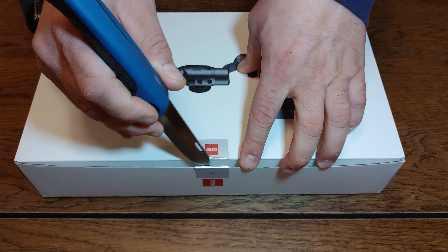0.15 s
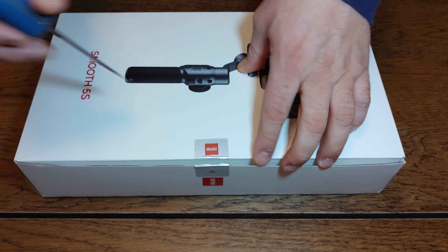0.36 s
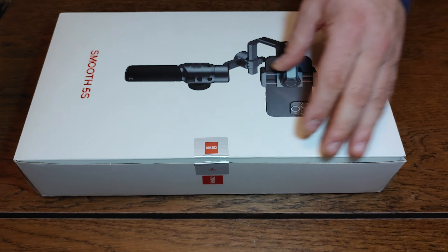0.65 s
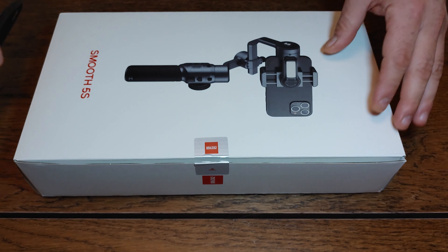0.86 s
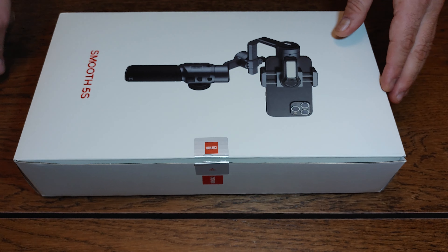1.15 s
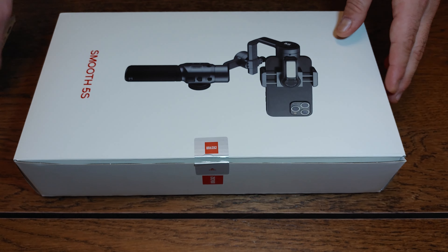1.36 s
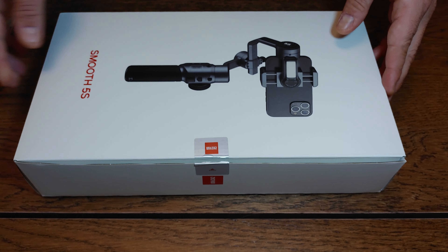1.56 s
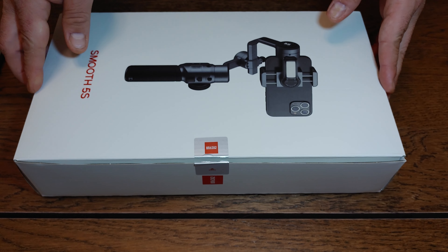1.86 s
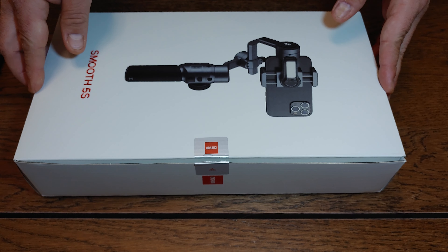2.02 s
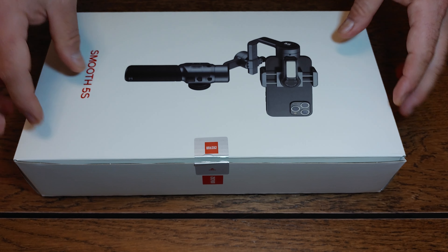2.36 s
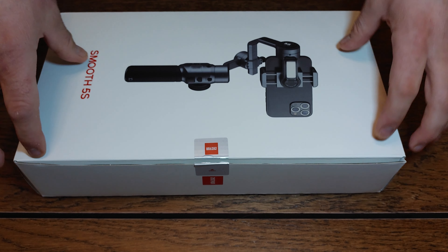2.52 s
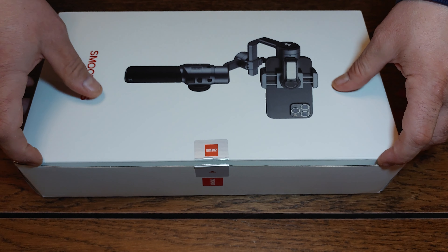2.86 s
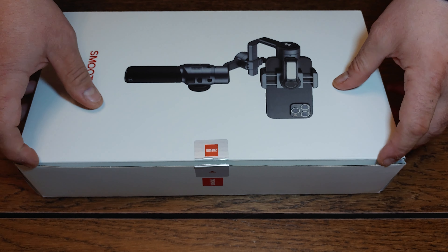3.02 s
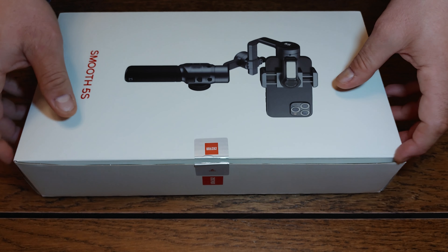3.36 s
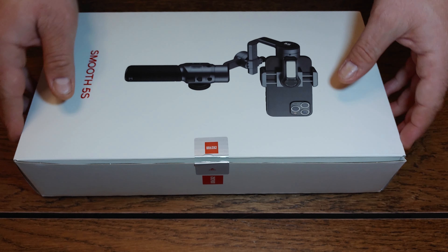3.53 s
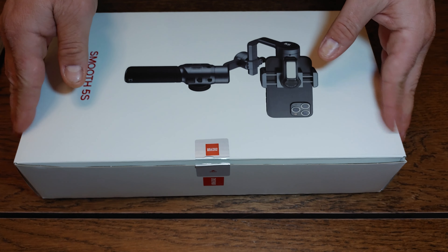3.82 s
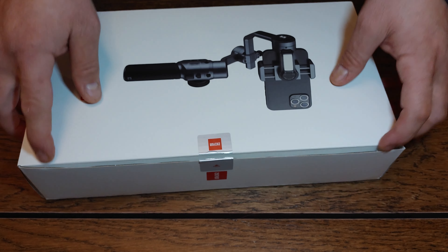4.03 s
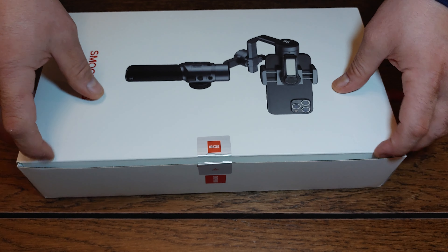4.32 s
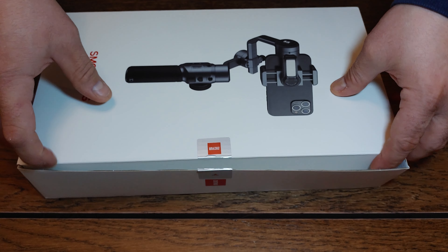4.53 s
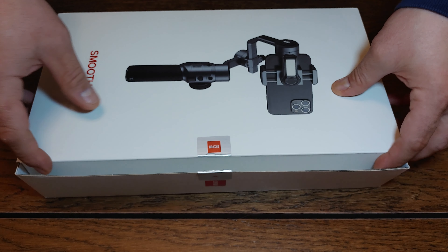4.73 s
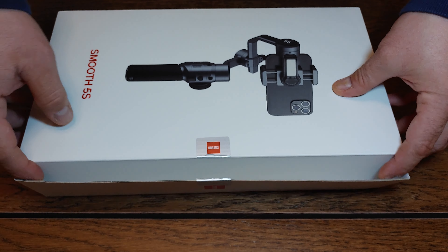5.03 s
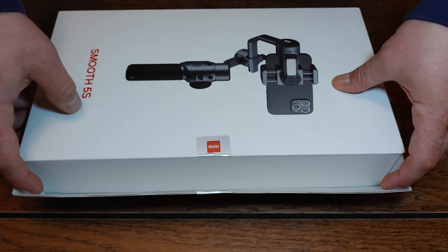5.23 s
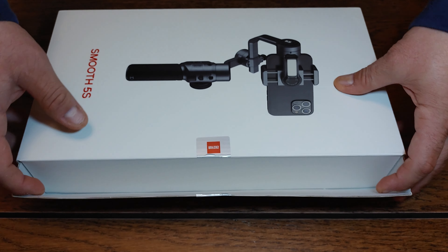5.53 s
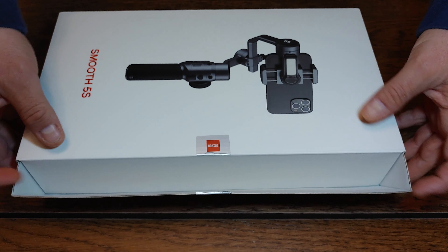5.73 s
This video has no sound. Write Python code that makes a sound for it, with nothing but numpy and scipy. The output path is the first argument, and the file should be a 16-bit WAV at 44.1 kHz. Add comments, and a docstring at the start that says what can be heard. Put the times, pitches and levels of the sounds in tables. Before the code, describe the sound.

A close, dry indoor sound of hands on a sturdy cardboard box on a wooden table, over a very faint room hush. From 0 to 0.7 s fingers brush the coated card, with low rubbing, small snaps and dull taps around 0.2 and 0.55 s. Near 1.2 s the box knocks hollowly and its contents rattle; softer knocks and a rub follow to 1.5 s, then a tiny hollow tick at 1.7 s. It is nearly quiet until 2.2 s. Light taps and short grainy swishes run from 2.5 to 3.9 s. From 4 s the tight lid drags in louder, overlapping rasps, with sinking boxy pops and a very sharp crack at about 4.37 s; strong thumps and clacks follow at 4.65 and 4.75 s. Looser scraping continues past 5 s, easing around 5.4 s, more pops near 5.6 s, then a bright scrape and rapid three-catch chatter at 5.8 s.

```python
"""Tight lid on a cardboard box

Two hands work the tight lid off a cardboard box on a wooden table, close by in a small room.
The box knocks on the table and rings in decaying modes; fingers rub its coated sides as grainy friction.
Then the lid drags upward in a denser rasp, its walls popping as sinking swings and its edges snapping
as noise bursts; it lets go with a short stick-slip chatter. The table sways below, over a quiet floor.
"""
import sys
import numpy as np
from scipy import signal
from scipy.fft import rfft, irfft
from scipy.io import wavfile

SR = 44100
rng = np.random.default_rng(int(sys.argv[2]) if len(sys.argv) > 2 else 0)


def master(y):
    """Save y as 16-bit WAV."""
    cut = np.clip(np.atleast_2d(y).T, -1, 1)
    pcm = np.round(cut * 32767)  # scale
    wavfile.write(sys.argv[1], SR, pcm.astype(np.int16))


N = 259308
TIME = np.arange(N) / SR


def amp(db):
    """Level to amplitude: 20 dB is a factor of ten."""
    return 10 ** (np.asarray(db) / 20)


def evened(x):
    """Power normalization: scales to rms 1."""
    return x / np.sqrt(np.mean(x ** 2) + 1e-20)


def peaked(x):
    """Peak normalization: scales to peak 1."""
    return x / (abs(x).max() + 1e-20)


def read(points, hz):
    """Interpolation on a log-frequency axis."""
    f, value = np.transpose(points)
    return np.interp(np.log(hz + 1), np.log(f + 1), value)


def add(mix, s, sound):
    """Superposition: mixes a sound in from time s, in place."""
    part = mix[max(round(s * SR), 0):][:len(sound)]
    part += sound[:len(part)]


def colour(x, points, size=4096):
    """Minimum-phase filtering: a causal response with the given spectrum."""
    log_gain = np.log(amp(read(points, abs(np.fft.fftfreq(size, 1 / SR)))))
    # the Hilbert transform of the log gain supplies the phase
    response = np.fft.ifft(np.exp(np.conj(signal.hilbert(log_gain)))).real
    return signal.fftconvolve(x, response[:size // 2])[:len(x)]


def wander(hz, size=N):
    """Band-limited chance: smooth noise of rms 1 with a Gaussian roll-off at the given rate."""
    roll_off = np.exp(-(np.fft.rfftfreq(size, 1 / SR) / hz) ** 2)
    return evened(irfft(rfft(rng.standard_normal(size)) * roll_off, size))


def tail(t60s, size=24000):
    """Diffuse decay: dense ringing of energy 1, each band dying at its own speed."""
    hz, t, z = signal.stft(rng.standard_normal(size), SR, nperseg=256)
    decay = amp(-60 * t / read(t60s, hz)[:, None])
    ring = signal.istft(z * decay, SR, nperseg=256)[1][:size]
    return ring / np.linalg.norm(ring)


def roam(x, depth_db, patch_hz, patch_s, size=1024):
    """Moving excitation: a contact travelling over the panel wakes one resonance group after another."""
    overlap = size * 3 // 4
    hz, t, z = signal.stft(x, SR, nperseg=size, noverlap=overlap)
    across, along = np.fft.fftfreq(len(hz), hz[1])[:, None], np.fft.fftfreq(len(t), t[1])
    blur = np.exp(-(across * patch_hz) ** 2 - (along * patch_s) ** 2)
    patches = evened(np.fft.ifft2(np.fft.fft2(rng.standard_normal(z.shape)) * blur).real)
    return signal.istft(z * amp(depth_db * patches), SR, nperseg=size, noverlap=overlap)[1][:N]


def friction(spectra, grains_per_s, grain_db, smooth, judder_db, judder_hz, roam_db, patch_hz, patch_s):
    """Granular friction: uneven tiny slips, bunched by the hand's judder; one sound per card spectrum."""
    sizes = amp(grain_db * np.minimum(rng.exponential(1, N), 4))
    grains = (rng.random(N) < grains_per_s / SR) * rng.choice([-1, 1], N) * sizes
    drive = evened(grains) + smooth * rng.standard_normal(N)
    drive = drive * amp(judder_db * wander(judder_hz))
    drive = roam(drive, roam_db, patch_hz, patch_s)
    return [evened(colour(drive, spectrum)) for spectrum in spectra]


# ringing of the card's dense upper modes: (frequency [Hz], t60 [s])
PANEL_T60 = [(1500, 0.036), (10000, 0.062)]


def panel(x, ring_db=-2, size=6000):
    """Modal overlap: many narrow upper modes ring on after every slip and fuse the grains into a rush."""
    ringing = signal.fftconvolve(x, tail(PANEL_T60, size=size))[:N]
    return evened(x + amp(ring_db) * ringing)


# a stroke is this far down one rise before and one fall after its crest; 1 = pointed crest, 2 = round
STROKE_EDGE_DB, STROKE_ROUNDNESS = -27.5, 1.714
SHEEN_STEEPNESS = 2.4  # the sheen comes only near full speed: its fade in dB is this many times larger


def stroke_gain(rows):
    """Speed law of friction: drone, rasp, hiss and sheen swell to each stroke's crest and sink again."""
    power = np.zeros((4, N))
    edge_db = STROKE_EDGE_DB * np.array([[1], [1], [1], [SHEEN_STEEPNESS]])
    for s, rise, fall, *levels_db in rows:
        away = np.maximum((s - TIME) / rise, (TIME - s) / fall)
        near = away < 2
        shape = amp(edge_db * away[near] ** STROKE_ROUNDNESS)
        power[:, near] += (amp(levels_db)[:, None] * shape) ** 2
    return np.sqrt(power)


# colours of drone, rasp and hiss under the fingers: three lists of (frequency [Hz], density [dB per Hz])
FINGER_COLOURS = [
    [(110, -58), (185, -3), (259, -1), (323, 2), (369, -3.5), (470, -20), (600, -8), (708, -7),
     (813, -13.5), (950, -9.5), (1110, -8.5), (1190, -17.5), (1500, -23), (1950, -27), (3300, -120)],
    [(760, -29), (1300, 6.5), (1490, 1), (1660, -11), (1850, -5), (2160, -1), (2600, 2), (3190, 8),
     (3800, -6), (4940, -47.5), (8360, -120)],
    [(2290, -66.5), (3900, -3), (4400, 7), (5200, 3.5), (5700, 5.5), (6100, 4.5), (6650, 4.5), (7200, 2.5),
     (7970, -0.5), (9060, -11.5), (10400, -19.5), (11800, -21), (12900, -36.5), (15800, -45)],
]
# the same three under the loose lid: (frequency [Hz], density [dB per Hz])
LOOSE_COLOURS = [
    [(65, -18), (110, -63), (135, -34), (172, -8), (199, -0.5), (252, 1.5), (378, -0.5), (461, -10.5),
     (537, -9.5), (626, -1.5), (706, -1.5), (813, -1), (937, 5), (1000, -3.5), (1150, -18.5), (1360, -13),
     (1500, -16.5), (1950, -9), (3300, -120)],
    [(760, -26), (1300, -9), (1610, -1), (1800, 5.5), (1950, -2), (2130, 12), (2390, -6), (2980, -7),
     (3800, -13.5), (4940, -23), (8360, -120)],
    [(2290, -0.5), (3900, -0.5), (4900, 2), (5380, -0.5), (6680, 1), (7560, 3), (8200, -8), (8900, -7),
     (10100, -22), (11900, -22), (12500, -31), (15800, -26)],
]
# the same three while the lid sits tight: (frequency [Hz], density [dB per Hz])
TIGHT_COLOURS = [
    [(65, -49), (110, -35), (150, -14), (205, 7), (258, 3.5), (280, 13.5), (300, -10), (345, 4), (385, 0.5),
     (460, -5.5), (538, -2), (640, -2), (706, -3.5), (770, -0.5), (946, -6), (1030, -10.5), (1090, -3.5),
     (1250, -14), (1500, -21), (1950, -24), (3300, -120)],
    [(760, -37), (1250, 4), (1700, -2), (2050, -13.5), (2400, 4.5), (2850, 3), (3400, 1.5), (3700, -2.5),
     (4100, -5), (5000, -41), (8400, -120)],
    [(1800, -22), (3000, -0.5), (3700, -10), (4300, -3), (4750, 1), (5250, 1), (5750, 1), (6300, 1),
     (7900, 1), (8600, -8.5), (9800, -29), (11700, -18), (12400, -32), (15800, -69)],
]
# colour of the sheen, the brightest part of the hiss: (frequency [Hz], density [dB per Hz])
SHEEN_COLOUR = [(6500, -47), (8800, 3), (9600, -2.5), (11000, -5), (12100, -12.5), (12500, -20),
                (15800, -41)]
# how far the lid has come loose: (time [s], looseness [0-1])
LOOSENESS = [(4.65, 0.25), (4.98, 0.78)]
# fingers brush the box: (time of greatest speed [s], rise [s], fall [s], drone of the board [dB],
# rasp of the fibres [dB], hiss of the coating [dB], sheen [dB])
BRUSHES = [(.012, 0.21, 0.18, -30, -56, -54, -73), (.05, 0.25, 0.04, -54, -42.5, -48.5, -80),
           (.225, 0.095, 0.045, -36.5, -48, -55.5, -63), (.33, 0.18, .1, -69, -63, -69, -72),
           (.408, 0.049, 0.013, -48, -53, -53, -61), (.595, 0.075, 0.1, -41.5, -53, -56, -63),
           (.69, 0.033, 0.018, -69, -69, -61.5, -57), (.83, 0.032, 0.027, -71, -71, -66.5, -87),
           (.97, 0.26, 0.29, -65, -70.5, -79, -86), (1.225, 0.093, 0.061, -49, -55, -66, -85),
           (1.335, 0.19, 0.044, -30, -59, -63.5, -75), (1.368, 0.025, 0.026, -36, -59, -63, -76),
           (1.58, 0.28, 0.095, -61.5, -75, -74.5, -76), (2.245, .03, 0.043, -54, -68.5, -61, -66.5),
           (2.566, 0.032, 0.039, -41.5, -50, -43.5, -62.5), (2.68, 0.2, 0.16, -58.5, -61, -58.5, -77),
           (2.662, 0.041, 0.019, -43.5, -50.5, -42.5, -73), (2.762, 0.048, 0.067, -52, -57, -46, -76),
           (2.852, 0.041, 0.11, -46.5, -70, -61, -63), (3.11, 0.093, 0.055, -43, -65, -57.5, -68),
           (3.23, 0.17, 0.1, -36, -47, -47.5, -66), (3.386, 0.041, 0.055, -39, -48.5, -44.5, -54),
           (3.499, 0.037, 0.038, -39, -51.5, -43.5, -50), (3.58, 0.058, 0.15, -60, -67.5, -65, -78),
           (3.7, 0.11, 0.14, -63, -71, -64.5, -73), (3.8, 0.081, 0.063, -56.5, -71, -67.5, -71),
           (3.9, 0.043, 0.067, -42.5, -59.5, -54, -51.5)]
# the lid slides a little with each pull: (time of greatest speed [s], rise [s], fall [s], drone [dB],
# rasp [dB], hiss [dB], sheen [dB])
PULLS = [(4.023, 0.092, 0.18, -40.5, -45, -38.5, -45.5), (4.147, 0.11, 0.051, -42, -61, -40.5, -55),
         (4.225, 0.17, 0.047, -33.5, -46.5, -62, -80), (4.275, 0.12, 0.064, -31.5, -42.5, -43.5, -59),
         (4.405, 0.12, 0.2, -30.5, -39.5, -42, -56), (4.475, 0.037, 0.088, -28, -39, -51, -70),
         (4.547, 0.091, 0.23, -28, -37, -38, -43.5), (4.658, 0.067, 0.069, -30, -33.5, -34.5, -46),
         (4.785, 0.1, 0.11, -37.5, -43, -50, -62), (4.863, 0.031, 0.15, -36, -38, -39, -54),
         (5.03, 0.22, 0.37, -32, -35, -47.5, -78), (5.216, 0.17, 0.086, -35, -32, -34.5, -51),
         (5.311, 0.31, 0.1, -36, -65, -55.5, -73), (5.46, 0.23, 0.3, -45.5, -68, -62, -75),
         (5.557, 0.084, 0.18, -32, -46.5, -44.5, -54), (5.635, 0.031, 0.12, -33.5, -42, -42, -56),
         (5.725, 0.078, .1, -37, -54, -44.5, -45.5), (5.814, 0.098, 0.067, -35, -33.5, -30, -36),
         (5.878, 0.038, 0.046, -29.5, -34, -42, -52)]


def rubbing(finger_boom_db=-5.5, lid_boom_db=0.5):
    """Sliding friction: fingers brush the coating, the lid drags on the walls; both gain sheen at speed."""
    # each group holds finger, loose lid and tight lid, in that order
    low, mid, high = zip(FINGER_COLOURS, LOOSE_COLOURS, TIGHT_COLOURS)
    drone = friction(low, grains_per_s=350, grain_db=-1.5, smooth=1.0, judder_db=0.5, judder_hz=50,
                     roam_db=3.0, patch_hz=147, patch_s=0.09)
    finger_rasp = friction(mid[:1], grains_per_s=500, grain_db=-4, smooth=0.31, judder_db=0.0,
                           judder_hz=90.2, roam_db=3.0, patch_hz=230, patch_s=0.064)
    lid_rasp = friction(mid[1:], grains_per_s=610, grain_db=0.0, smooth=0.91, judder_db=3.0,
                        judder_hz=140, roam_db=1.9, patch_hz=234, patch_s=0.033)
    finger_hiss = friction(high[:1], grains_per_s=1200, grain_db=3.0, smooth=0.33, judder_db=0.3,
                           judder_hz=140, roam_db=4.5, patch_hz=280, patch_s=0.05)
    lid_hiss = friction(high[1:], grains_per_s=1800, grain_db=-3.0, smooth=0.81, judder_db=2.4,
                        judder_hz=178, roam_db=3.0, patch_hz=280, patch_s=0.026)
    sheen = friction([SHEEN_COLOUR], grains_per_s=1100, grain_db=5, smooth=0.99, judder_db=4.2,
                     judder_hz=180, roam_db=6, patch_hz=280, patch_s=0.046)
    layers = (finger_rasp + lid_rasp, finger_hiss + lid_hiss, sheen * 3)
    upper = [[panel(x) for x in layer] for layer in layers]
    skin, free, tight = np.swapaxes([drone, *upper], 0, 1)
    loose = np.clip(np.interp(TIME, *np.transpose(LOOSENESS)), 0, 1)
    card = loose * free + (1 - loose) * tight
    # each drone's lowest modes get a level of their own
    skin[0] = colour(skin[0], [(330, finger_boom_db), (480, 0.02)])
    card[0] = colour(card[0], [(330, lid_boom_db), (480, 0)])
    return (stroke_gain(BRUSHES) * skin + stroke_gain(PULLS) * card).sum(0)


def crackle(per_s=170, spread_db=3, below_db=-9):
    """Impulsive fibre slip: single paper fibres catch and let go along every stroke, following the rasp."""
    sizes = amp(spread_db * np.minimum(rng.exponential(1, N), 3))
    clicks = (rng.random(N) < per_s / SR) * rng.choice([-1, 1], N) * sizes
    fibres = evened(colour(clicks, [(200, -15.0), (700, -2.0), (1100, 13.5), (3000, -0.5), (6500, -8.0),
                                    (11000, -40.0), (15000, -50)]))
    return amp(below_db) * fibres * stroke_gain(BRUSHES + PULLS)[1]


# a wall slips and flexes: (time [s], thump before a 7 dB cut [dB], pitch it sinks to [Hz], clack peak [dB])
FLEXES = [(0.178, -24.5, 288, -65), (0.202, -28, 348, -42), (0.308, -27.5, 300, -46),
          (0.593, -19, 230, -32), (1.344, -19, 264, -28), (1.628, -42.5, 172, -70),
          (2.24, -31.5, 208.3, -67), (2.307, -40.5, 204, -50), (2.814, -36, 226.5, -68),
          (2.866, -23.5, 240, -42), (3.093, -41, 310, -59), (3.136, -31, 295, -47), (3.248, -26, 193, -60),
          (3.692, -32.5, 222, -61), (3.779, -33, 266, -63), (3.856, -33, 264, -57), (3.941, -30, 243, -34),
          (3.992, -25, 277, -28.5), (4.125, -15.5, 304, -20), (4.232, -29, 298, -25), (4.373, -8, 221, -15),
          (4.464, -11, 217, -26), (4.486, -16, 198, -41), (4.641, -8.5, 248, -15.5),
          (4.655, -18.5, 188, -32), (4.753, -8.5, 207, -9), (4.914, -16.5, 264, -22),
          (5.043, -10, 244, -46), (5.149, -28, 265, -28), (5.324, -23.5, 252, -44),
          (5.525, -18.5, 246, -22.5), (5.602, -23, 275, -13.5), (5.664, -24.5, 190, -23.5),
          (5.685, -22, 255, -22), (5.709, -20.5, 257, -23.5)]
# colour of the clack: (frequency [Hz], density [dB per Hz])
CLACK_COLOUR = [(150, 1.5), (400, 1), (950, 3.5), (1400, -3), (3000, -12.5), (5000, -46.5), (11000, -40),
                (14000, -66)]


def flexes(sweep=0.75, sweep_s=0.0036, cycles=2.06, clack_s=0.0061, shudder_s=0.014, shudder_db=-4,
           lowest_hz=135, size=6000):
    """Dispersion of bending waves: a clack, a few sinking swings (slow waves last), an uneven shudder."""
    out, t = np.zeros(N), np.arange(size) / SR
    for s, db, hz, clack_db in FLEXES:
        pitch = hz * (1 + sweep * np.exp(-t / sweep_s)) * np.exp(0.1 * wander(137, size=size))
        turns = np.cumsum(pitch) / SR
        age = t * hz / cycles
        thump = age * np.exp((1 - age ** 2) / 2) * np.sin(2 * np.pi * turns)
        shudder = colour(rng.standard_normal(size) * np.exp(-t / shudder_s),
                         [(60, -25), (hz / 2, -19), (hz, 0), (3 * hz, -14), (3000, -45), (8000, -70)])
        clack = colour(rng.standard_normal(size) * np.exp(-t / clack_s), CLACK_COLOUR)
        swing = thump + amp(shudder_db) * peaked(shudder)
        add(out, s, amp(db - 7.0) * swing + amp(clack_db) * peaked(clack))
    return signal.lfilter(*signal.butter(2, lowest_hz, "high", fs=SR), out)


# card edges snap past each other: (time [s], peak [dB], length [s], brightest frequency [Hz])
SNAPS = [(0.039, -49, 0.001, 3500), (0.059, -27, 0.00067, 5370), (0.063, -25, 0.0022, 5030),
         (0.18, -27, 0.0017, 2700), (0.191, -34, 0.011, 6960), (0.204, -24.5, 0.0017, 7000),
         (0.595, -34, 0.0014, 7000), (1.2025, -38, 0.0011, 2600), (1.369, -42.5, 0.0028, 1600),
         (1.591, -53, .002, 4450), (1.707, -40.5, 0.0021, 5630), (2.548, -32, 0.0013, 4170),
         (2.6462, -35, 0.00057, 4230), (2.865, -34.5, 0.00055, 6200), (4.117, -47, 0.0037, 2510),
         (4.337, -27.5, 0.0085, 3160), (4.356, -29, 0.0012, 5500), (4.3716, -0.5, 0.0011, 2940),
         (4.469, -26.5, 0.0092, 6740), (4.649, -18, 0.0012, 5800), (4.752, -18.5, 0.0043, 4940),
         (5.04, -31, 0.0087, 6600), (5.142, -32, 0.0015, 9000), (5.602, -20, 0.0024, 8900)]


def snaps(size=4000):
    """Impact excitation: a tight cluster of breaking contacts rings the edge of the card."""
    out, t = np.zeros(N), np.arange(size) / SR
    for s, db, length, hz in SNAPS:
        burst = rng.standard_normal(size) * (t / length) * np.exp(-2 * t / length)
        burst = colour(burst, [(hz / 10, -15), (hz / 1.2, -5), (hz, 0), (1.2 * hz, -5), (2 * hz, -7),
                               (4 * hz, -11)])
        burst = colour(burst, [(7800, 0), (9000, -6), (11300, -8), (12800, -23), (16000, -34)])
        add(out, s, amp(db) * peaked(burst))
    return out


# the rim catches three times as it comes free: (start [s], length [s], scrape [dB],
# ring before a 7 dB cut [dB])
CHATTER = [(5.812, 0.0062, -19.5, -14), (5.824, 0.0068, -23, -11), (5.839, 0.0061, -18, -32)]
# colour of the scraping rim: (frequency [Hz], density [dB per Hz])
RIM_COLOUR = [(120, -62), (200, -20), (446, -20), (842, -5), (992, 0), (1170, -21), (1450, 4), (1790, -1.5),
              (2050, -11), (2290, 3), (2510, -11.5), (4260, -17), (4800, -12), (7620, -11), (11200, -20),
              (12600, -35), (15500, -54)]
SLIP_HZ, SLIP_RISE_HZ_PER_S = 442.4, 4500  # the slips speed up as the lid gets away
RIM_HZ = 998  # the rim's main mode
SCRAPE_EDGE_S, RIM_RING_S = 0.0025, 0.0027  # fade of scrape and ring on either side of a catch


def chatter(jitter=0.14, slip_turns=0.21, grit=0.18, squeeze=3.4):
    """Stick-slip: each slip is a kick and a puff of grit, limited by the card's give; catches ring the rim."""
    rate = SLIP_HZ + SLIP_RISE_HZ_PER_S * np.clip(TIME - CHATTER[0][0], 0, .04)
    turns = np.cumsum(rate * np.exp(jitter * wander(300))) / SR
    kicks = np.diff(np.floor(turns), prepend=0)
    drive = kicks + grit * np.exp(-(turns % 1) / slip_turns) * rng.standard_normal(N)
    limited = np.tanh(evened(drive - drive.mean()) / squeeze)
    scrape = evened(colour(limited, RIM_COLOUR))
    ring = evened(np.sin(2 * np.pi * RIM_HZ * TIME))
    out = np.zeros(N)
    for s, length, db, ring_db in CHATTER:
        away = abs(TIME - np.clip(TIME, s, s + length))
        out += amp(db) * scrape * np.exp(-away / SCRAPE_EDGE_S)
        out += amp(ring_db - 7) * ring * np.exp(-away / RIM_RING_S)
    return out


# the box knocks on the table: (time [s], ring before a 7 dB cut [dB], softness corner: weak above [Hz],
# corner-blow limit: weak below [Hz], tick peak [dB], rattle of the contents before a 4.5 dB lift [dB])
KNOCKS = [(0.179, -37, 1150, 368, -31.5, -21), (.549, -28.5, 1550, 450, -65, -32),
          (1.1788, -10, 1600, 132, -19, -21), (1.359, -13, 440, 146, -72, -29.5),
          (1.506, -16.5, 307, 210, -82.5, -62)]
# what the full box rings with: (frequency [Hz], level [dB], t60 before the grip's damping [s])
BOX_MODES = [(132, -10.5, 0.2), (162.4, -13, 0.32), (201, -4, 0.11), (271.3, -12.5, 0.34),
             (358.3, -3, 0.45), (389, -2.5, 0.09), (391, -20.5, 0.14), (464, -15.5, 0.73),
             (552.4, -4, 0.15), (604, 2.5, 0.056), (685, -2.5, 0.13), (823, -6, 0.12), (940, -12, 0.43),
             (997, -8, 0.57), (1115, -12, 0.29), (1130, 0, 0.12), (1600, -17.5, 0.49), (1620, -24.5, 0.33)]
# colour of the rattling contents: (frequency [Hz], density [dB per Hz])
RATTLE_COLOUR = [(59, -76.5), (100, -27), (196, -4.5), (318, -26), (357, 1.5), (441, -21.5), (476, -7.5),
                 (1010, -12.5), (1830, -28), (2550, -27.5), (4540, -56.5), (6540, -30), (10000, -91),
                 (13000, -89.5), (22000, -120)]
# decay of the rattle: (frequency [Hz], t60 [s])
RATTLE_T60 = [(100, 0.28), (400, 0.31), (1000, 0.35), (2500, 0.24), (8000, 0.088)]


def knocks(tick_s=0.0016, rattle_rough_db=3, grip_s=0.17, ring_rough_db=2, ring_waver=.018, size=24000):
    """Modal impact: a blow rings the box and shakes its contents; the grip bends and damps the ring."""
    out, t = np.zeros(N), np.arange(size) / SR
    for s, db, soft_hz, low_hz, tick_db, rattle_db in KNOCKS:
        ring = np.zeros(size)
        for k, (hz, mode_db, t60) in enumerate(BOX_MODES):
            level = amp(mode_db - 60 * t / t60 + ring_rough_db * wander(50, size=size))
            softened = level / np.hypot(1, (hz / soft_hz) ** 3)  # soft blows lose the treble
            turns = hz * np.cumsum(1 + ring_waver * wander(64, size=size)) / SR
            ring += (-1) ** k * softened * np.sin(2 * np.pi * turns + rng.uniform(0, np.pi))
        rattle = tail(RATTLE_T60) * amp(rattle_rough_db * wander(95, size=size))
        rattle = colour(rattle, RATTLE_COLOUR)
        rattle = signal.lfilter(*signal.butter(1, min(2 * soft_hz, SR / 3), fs=SR), rattle)
        onset = (1 - np.exp(-t * soft_hz)) ** 2
        damped_ring = amp(db - 7.0 - 20 * (t / grip_s) ** 3) * ring
        blow = onset * (damped_ring + amp(rattle_db + 4.5) * peaked(rattle))
        blow = signal.lfilter(*signal.butter(2, low_hz, "high", fs=SR), blow)
        tick = colour(rng.standard_normal(size) * np.exp(-t / tick_s),
                      [(200, 17.5), (1200, 1.5), (3000, 14), (7000, -2.0), (10000, -37.0)])
        add(out, s, blow + amp(tick_db) * peaked(tick))
    return out


# fingertips tap the card: (time [s], peak [dB], hollow pitch [Hz], decay [s])
TAPS = [(0.179, -28, 726, 0.012), (0.225, -27.5, 720, 0.055), (.5495, -24, 770, 0.0063),
        (.559, -30, 1430, 0.016), (2.210, -45, 820, 0.0083), (2.232, -41, 714, 0.0093),
        (2.269, -41.5, 740, 0.004), (2.306, -38, 650, 0.0071), (2.537, -39.5, 910, 0.047),
        (2.646, -41.5, 680, 0.0031), (2.976, -47, 636, 0.0027), (3.027, -49.5, 710, 0.012),
        (3.057, -38, 720, 0.0083), (3.096, -34.5, 746, 0.011), (3.216, -42, 606, 0.0098),
        (3.579, -48.5, 560, 0.0058), (3.727, -49, 1360, .005), (3.853, -37.5, 700, 0.02),
        (4.215, -20, 707, 0.01), (4.371, -10, 1020, 0.015), (5.293, -34, 900, 0.0074),
        (5.402, -29.5, 870, 0.0068), (5.484, -36, 925, 0.0078), (5.548, -21.5, 940, 0.0031)]


def taps(width=0.18, size=5000):
    """Local resonance: a soft fingertip excites the patch of card under it in a dull, hollow burst."""
    out, t = np.zeros(N), np.arange(size) / SR
    for s, db, hz, decay in TAPS:
        burst = rng.standard_normal(size) * np.exp(-t / decay)
        shape = [(80, -30), (220, -8), (hz / (1 + width), -8), (hz, 0), (hz * (1 + width), -13),
                 (hz * 2.26, -29), (hz * 5, -47), (13000, -70)]
        add(out, s, amp(db) * peaked(colour(burst, shape)))
    return out


# skin and card squeak faintly on the coating: (start [s], length [s], frequency [Hz], level [dB])
SQUEAKS = [(.36, .06, 3120, -65), (.345, .06, 2520, -64), (.56, .05, 2500, -55), (.615, .05, 2100, -57),
           (.33, .09, 850, -55), (.87, .26, 3220, -78), (1.355, .04, 6700, -66), (1.37, .04, 6150, -68),
           (3.765, .055, 5120, -64), (4.337, .016, 3400, -35)]


def squeaks(waver=0.01):
    """Stick-slip oscillation: the coating sticks and slips fast enough to give a thin, broken tone."""
    out = np.zeros(N)
    for s, length, hz, db in SQUEAKS:
        size = round(length * SR)
        turns = np.cumsum(hz * (1 + waver * wander(400, size=size))) / SR
        grip = amp(5.8 * wander(130, size=size) + 3.8 * wander(23, size=size))
        tone = np.sin(2 * np.pi * turns) * grip * signal.windows.tukey(size, .5)
        add(out, s, amp(db) * evened(tone))
    return out


# a packed part settles with a small hollow tick: (time [s], peak [dB])
TICKS = [(1.7056, -38), (1.712, -30.5), (1.7261, -42)]
# modes of the part: (frequency [Hz], level [dB], t60 [s])
TICK_MODES = [(344, 11, 0.045), (787, 0.5, 0.026), (934, 2.5, 0.024), (1600, 1.5, 0.019),
              (1740, -20, 0.023), (3870, -14, 0.017), (5740, -10, 0.022)]


def ticks(rise_cycles=1.9, size=8000):
    """Modal ringing: a small part sounds in a few clear modes; the low ones take longest to swell."""
    out, t = np.zeros(N), np.arange(size) / SR
    for s, db in TICKS:
        ring = np.zeros(size)
        for hz, mode_db, t60 in TICK_MODES:
            swell = 1 - np.exp(-t * hz / rise_cycles)
            ring += amp(mode_db - 60 * t / t60) * swell * np.sin(2 * np.pi * (hz * t + rng.random()))
        add(out, s, amp(db) * peaked(ring))
    return out


# lowest modes of the table top: (frequency [Hz], width [Hz], level [dB])
TABLE_MODES = [(34.9, 13, -8.5), (47.2, 4.2, -1.5), (57.34, 2.8, 0.5), (124.1, 39, -27)]
# shoves that set the table top swaying: (time [s], level [dB], pitch [Hz])
SHOVES = [(-.04, -31.5, 47.2), (.61, -57, 50.6), (1.18, -33, 57), (1.35, -38, 57.1), (1.724, -47.5, 52.3),
          (2.26, -57.5, 47.7), (2.55, -42.5, 42.5), (2.789, -47, 43), (3.08, -44.5, 52),
          (3.26, -45.5, 36.5), (3.44, -48.5, 36), (3.95, -53, 40.6), (4.19, -40, 50.8), (4.76, -28, 45.6),
          (5.06, -33.5, 56.6), (5.679, -35, 42.9)]
SHOVE_RISE_S, SWAY_FALL_DB_PER_S = 0.041, 109.5


def table(rub, drag_db=-15, drag_s=0.055, waver=0.092):
    """Forced vibration: shoves swell and die at their own pitches; the rubbing's drag keeps the top moving."""
    hz = np.fft.rfftfreq(N, 1 / SR)
    shape = sum(amp(db) / (1 + ((hz - f) / (width / 2)) ** 2) for f, width, db in TABLE_MODES)
    keep = np.exp(-1 / (drag_s * SR))
    drag = amp(drag_db) * np.sqrt(signal.lfilter([1 - keep], [1, -keep], rub ** 2))
    out = drag * evened(irfft(rfft(rng.standard_normal(N)) * shape, N))
    uneven_time = np.cumsum(1 + waver * wander(30)) / SR
    for s, db, sway_hz in SHOVES:
        swell = np.clip((TIME - s) / SHOVE_RISE_S, 0, 1)
        fall_db = SWAY_FALL_DB_PER_S * np.maximum(TIME - s - SHOVE_RISE_S, 0)
        out += swell * amp(db - fall_db) * evened(np.sin(2 * np.pi * sway_hz * uneven_time))
    return out


# reverberation of the room: (frequency [Hz], t60 [s])
ROOM_T60 = [(100, 0.2), (1000, 0.37), (5000, 0.3), (14000, 0.15)]


def room(x, wet_db=-14, delay_s=.008):
    """Reverberation: a small furnished room answers faintly with a delayed diffuse tail."""
    out = np.zeros(N)
    add(out, delay_s, amp(wet_db) * signal.fftconvolve(x, tail(ROOM_T60))[:N])
    return out


# colour of the room's quiet: (frequency [Hz], density [dB per Hz])
QUIET_COLOUR = [(15, -49.5), (25, -1.5), (461, -4.5), (542, -9), (654, -14), (981, -17), (1060, -13),
                (1430, -22), (1870, -20), (2390, -25), (2590, -23.5), (3130, -22), (3990, -21.5),
                (11400, -23.5), (13000, -36), (15800, -46)]


def quiet(level_db=-66):
    """Stationary background noise: the room's quiet is a steady coloured hush."""
    return amp(level_db) * evened(colour(rng.standard_normal(N), QUIET_COLOUR))


def scene():
    """Superposition: the box and the hands in the room, over the swaying table and the room's quiet."""
    blows = knocks() + ticks() + taps() + flexes() + snaps() + squeaks()
    rub = rubbing() + crackle()
    box = blows + rub + chatter()
    return (box + room(box) + table(rub) + quiet())[None]


def record(dry, edge_hz=15900):
    """Band limiting: a linear-phase low-pass removes what lies above the edge."""
    low_pass = signal.firwin(511, edge_hz, window=("kaiser", 9), fs=SR)
    return signal.oaconvolve(dry, low_pass[None], "same")


dry = scene()
out = record(dry)
master(out)
```